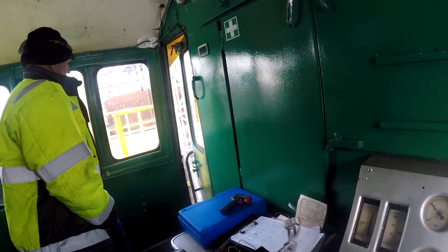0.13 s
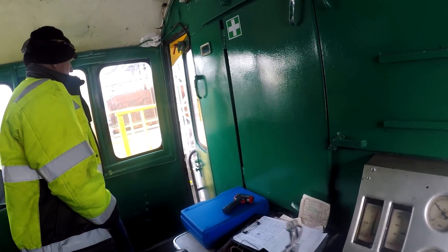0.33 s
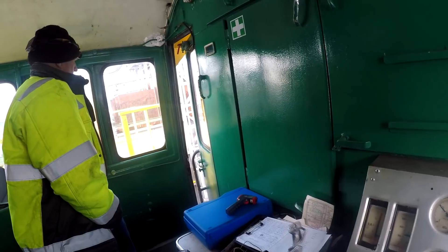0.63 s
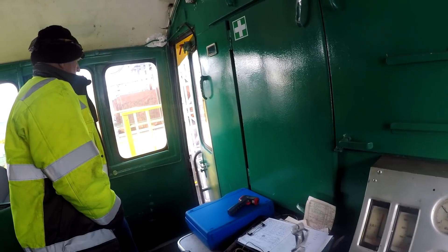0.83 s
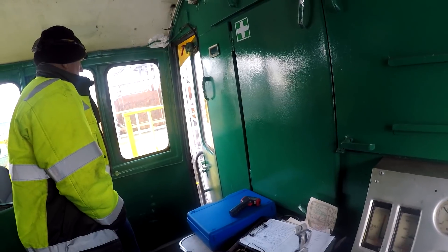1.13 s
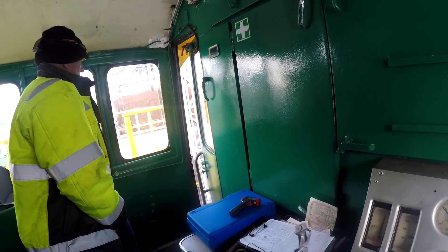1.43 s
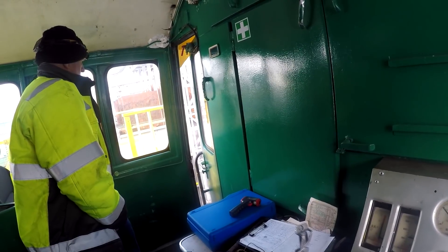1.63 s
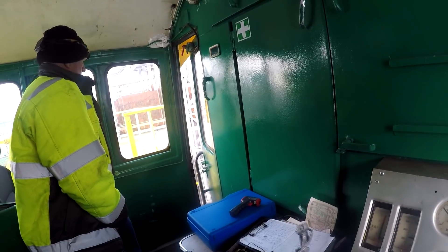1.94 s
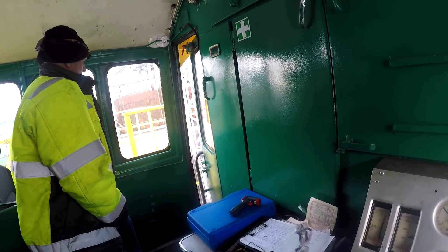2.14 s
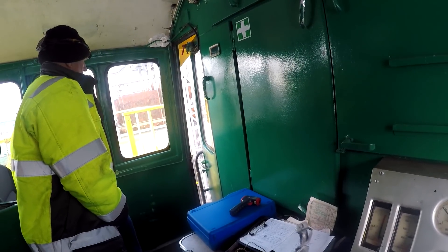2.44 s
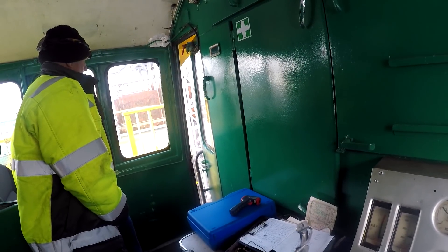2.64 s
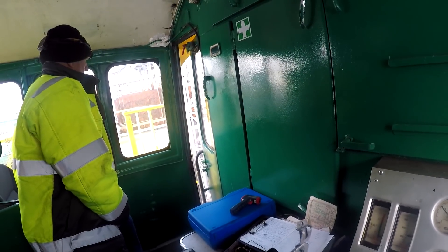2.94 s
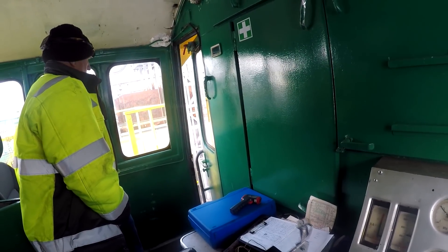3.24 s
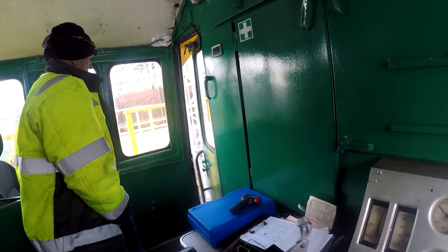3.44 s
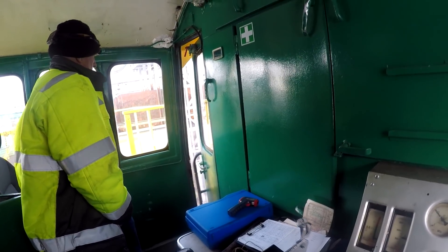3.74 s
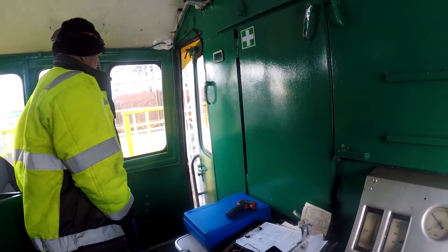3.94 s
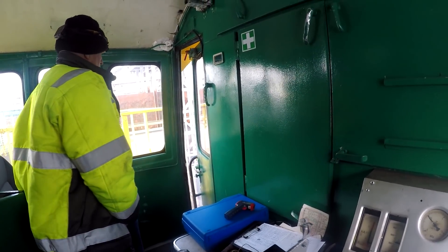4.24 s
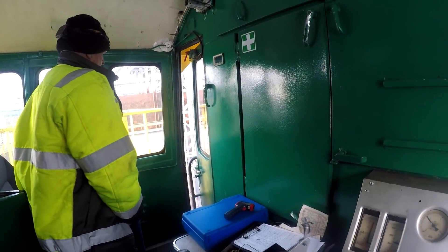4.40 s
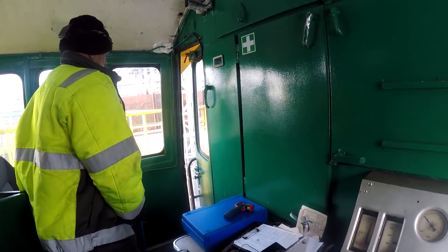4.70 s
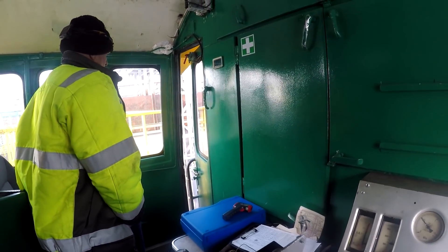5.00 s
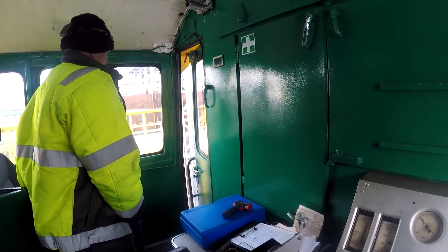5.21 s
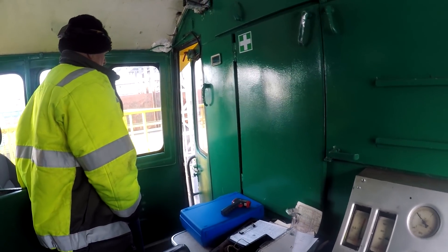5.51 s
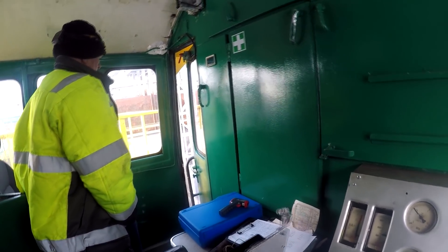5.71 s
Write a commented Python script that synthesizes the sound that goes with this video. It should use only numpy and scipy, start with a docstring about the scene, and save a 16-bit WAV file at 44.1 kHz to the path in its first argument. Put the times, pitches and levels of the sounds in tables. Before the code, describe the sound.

For about six seconds a large diesel locomotive engine idles at constant speed, heard in stereo inside its closed steel cab. A deep drone throbs with a lope about three times a second, while dull noisy firing pulses beat roughly 37 times a second. A compressor hums alongside, beating with the engine in a low boom two to three times a second. Steel parts ring briefly in a repeating round, and short hollow tones swell and fade in the drone. A loose panel sizzles brightly and unevenly throughout, easing slightly, with sharper snaps from about 0.9 s onward. Harder knocks clank irregularly, clearly around 1.8, 2.4 and 2.7 s. Dry sheet-metal rattles come and go, strongest near 5.3 s. Faint gear whine stays underneath. Small fittings clink at 4.2 and 5.3 s, then most clearly with a bright tick at 5.7 s and dull rings at 5.8 s.

```python
"""Diesel locomotive cab at idle

Inside a closed cab, a twelve-cylinder four-stroke idles at about 370 rpm: sums of shaft orders drone and throb,
and shaped noise pulses at the firing rate. Cylinder knocks ring steel parts in a repeating round, and short tones
swell and fade in the drone. An air compressor hums and beats with the engine in the cab's boom; a loose panel
sizzles as both shake it. Sheet metal rattles in bursts of noise, gears whine as faint sines and small fittings
clink as damped modes."""
import sys
import numpy as np
from scipy import signal
from scipy.fft import rfft, irfft
from scipy.io import wavfile
from scipy.ndimage import map_coordinates

SR = 44100
rng = np.random.default_rng(int(sys.argv[2]) if len(sys.argv) > 2 else 0)


def unload_wav(signal):
    """Save mono or channel-first audio to the path in sys.argv[1] as 16-bit WAV at rate SR, clipped to [-1, 1]."""
    wavfile.write(
        sys.argv[1],
        SR,
        np.round(np.clip(np.atleast_2d(signal).T, -1, 1) * 32767).astype(np.int16),
    )


N = 258426
T = np.arange(N) / SR
FREQS = np.fft.rfftfreq(N, 1 / SR)
# a 2 ms fade at both ends keeps the filters from clicking
EASE = np.clip(np.minimum(T, T[-1] - T) / .002, 0, 1)

CYCLE_HZ, COMPRESSOR_HZ = 3.1072, 26.68  # nominal rates of the engine cycle and the compressor shaft
FIRST_FIRING_S = .021  # a cylinder fires at this time

# steady engine drone: (multiple of the cycle rate, level [dB])
ENGINE_ORDERS = [(6, -23.1), (7, -41), (14, -38.4), (15, -32.9), (20, -33.5), (21, -38.5), (22, -33.5),
                 (24, -31), (25, -36), (26, -38), (30, -36), (36, -34), (42, -37.5), (90, -35), (100, -39),
                 (176, -42.5), (183, -42), (184, -39), (186, -43), (199, -40.5), (208, -43.5)]
# lope around the firing rate, order 12: (multiple of the cycle rate, level [dB])
LOPE_ORDERS = [(10, -33.9), (11, -29.3), (12, -23.3), (13, -28.8)]
LOPE_CREST_S = .216


def drone(cycles):
    """Harmonic orders: those around the firing rate swell together once a cycle, as the cylinders are unequal."""
    return hum(cycles, ENGINE_ORDERS, waver_db=.6) + throb(cycles, LOPE_ORDERS, LOPE_CREST_S)


# knock of each cylinder, in firing order: strength [dB]
CYLINDERS_DB = [0.062, -0.29, -0.088, 1.1, 0.57, 0.75, 1.05, -0.48, 0.04, -0.12, -0.35, 1.4]
# machinery noise behind the bulkhead, before the cab's response: (frequency [Hz], density [dB per Hz])
MACHINERY = [(12, -53), (30, -49.5), (70, -44), (100, -45), (140, -41.5), (230, -43), (430, -46.5),
             (700, -53.5), (1100, -64.5), (1700, -72.5), (2500, -75), (3500, -76), (4600, -81),
             (14000, -104)]
# part of that noise that comes back alike in every engine cycle: (frequency [Hz], power share [0-1])
REPEATING = [(70, 0.4), (150, 0.32), (330, 0.36), (550, 0.21), (1100, 0.24), (2500, 0.11)]
# resonances of the cab's air and steel walls: (frequency [Hz], width [Hz], gain [dB])
CAB_MODES = [(238, 20, 2), (427, 30, 1), (578, 18, 4.5), (616, 26, 6), (648, 10, 5), (778, 30, 2),
             (1060, 140, 2), (1385, 190, 6.3), (1795, 50, 3), (3400, 500, 1.5)]
# nodes of the cab's standing waves at the listener: (frequency [Hz], width [Hz], gain [dB])
CAB_NODES = [(178, 30, -2.5), (260, 14, -7), (302, 30, -2), (342, 10, -4), (378, 16, -4), (557, 10, -5),
             (633, 10, -8), (700, 70, -3), (830, 60, -1.5)]


def clatter(cycles, knock_db, knock_decay, smear_s):
    """Amplitude modulation: each firing gives a noisy blow, partly alike in every cycle; knock_decay is in firings."""
    length = int(SR / CYCLE_HZ)
    place = cycles % 1 * length
    one_cycle = rng.standard_normal((2, length))
    same = np.array([map_coordinates(row, [place], order=3, mode="wrap") for row in one_cycle])
    fresh = rng.standard_normal((2, N))
    share = np.clip(curve(REPEATING), 0, 1)
    noise = irfft(rfft(same) * np.sqrt(share) + rfft(fresh) * np.sqrt(1 - share), N)

    firing = cycles % 1 * len(CYLINDERS_DB)
    cylinder_db = np.array(CYLINDERS_DB)[firing.astype(int)]
    blow = undb(cylinder_db + knock_db * np.exp(-(firing % 1) / knock_decay))
    # each blow lingers between the steel walls
    blow = irfft(rfft(blow) / (1 + 2j * np.pi * FREQS * smear_s), N)
    cab_db = sum(db / (1 + (2 * (FREQS - hz) / width) ** 2) for hz, width, db in CAB_MODES + CAB_NODES)
    return colour(noise * unit_power(blow), curve(MACHINERY) + cab_db)


# steel parts that ring once in every engine cycle, before the common gain:
# (first crest [s], pitch [Hz], level [dB], length [s])
RINGS = [(.02, 203, -29, .06), (.055, 186, -29.5, .07), (.055, 158, -29, .06), (.08, 238, -29, .05),
         (.28, 244, -28, .07), (.085, 285, -26.5, .06), (.008, 315, -31, .06), (.13, 316, -31, .06),
         (.17, 429, -30.5, .06), (.255, 424, -31.5, .06), (.185, 573, -29, .09), (.06, 572, -33, .06),
         (.025, 620, -29, .04), (.15, 619, -29, .03), (.21, 617, -30, .08), (.018, 778, -32, .03),
         (.1, 785, -36, .02), (.19, 738, -35, .05), (.28, 835, -34, .02), (.11, 1070, -35, .02),
         (.172, 1060, -37, .025), (.025, 1335, -40, .016)]


def rings(cycles, gain_db, scatter_db, slack, rise):
    """Repeated excitation: every cycle sets the same parts ringing, with random strength and phase (slack in turns)."""
    out = np.zeros(N)
    for crest_s, hz, db, length_s in RINGS:
        turn = cycles + (FIRST_FIRING_S - crest_s) * CYCLE_HZ + .5
        age = (turn % 1 - .5) / CYCLE_HZ  # negative while the ring builds up
        # one pair of draws for each cycle
        strength, slip = rng.standard_normal((24, 2))[np.floor(turn).astype(int) + 1].T
        spread = np.where(age < 0, rise, 1 - rise) * length_s
        envelope = np.exp(-(age / spread) ** 2) * undb(db + scatter_db * strength)
        out += envelope * np.cos(2 * np.pi * (hz * age + slack * slip + rng.random()))
    return spread_tones(out) * np.sqrt(2) * undb(gain_db)


# short tonal swells in the cab's drone, before the common gain:
# (crest [s], pitch [Hz], level [dB], length [s])
TONAL_SWELLS = [(.33, 314, -20.5, .055), (.45, 318, -22.5, .11), (.76, 200, -22, .1), (.82, 573, -24, .08),
                (.98, 316, -22.5, .08), (1.05, 203, -22, .07), (1.13, 311, -23.5, .08),
                (1.36, 316, -23.5, .08), (1.73, 312, -21, .08), (1.79, 572, -26, .1),
                (1.93, 314, -20.5, .08), (2.05, 313, -22, .07), (2.11, 572, -24, .08),
                (2.68, 134, -21.5, .09), (2.7, 308, -21.5, .08), (2.92, 316, -22.5, .08),
                (3.22, 311, -21, .07), (3.4, 571, -24.5, .08), (3.65, 314, -20, .07),
                (3.88, 316, -22.5, .08), (3.93, 138, -22.5, .08), (4.28, 134, -21, .07),
                (4.37, 574, -26, .1), (4.52, 314, -22, .07), (4.68, 572, -26, .09), (4.77, 314, -22.5, .06),
                (4.84, 314, -20.5, .07), (5.0, 134, -23, .12), (5.05, 574, -24.5, .09),
                (5.16, 312, -21, .07), (5.26, 313, -19, .08), (5.29, 617, -26.5, .1),
                (5.48, 203, -21.5, .1), (5.59, 617, -27, .08), (5.8, 203, -20, .1)]


def tonal_swells(gain_db):
    """Gaussian envelope: short clear tones swell and fade in the drone."""
    out = np.zeros(N)
    for s, hz, db, length_s in TONAL_SWELLS:
        envelope = np.exp(-(2 * (T - s) / length_s) ** 2) * undb(db)
        out += envelope * np.cos(2 * np.pi * (hz * T + rng.random()))
    return spread_tones(out) * np.sqrt(2) * undb(gain_db)


# the hardest cylinder knocks: (time [s], relative strength [dB])
KNOCKS = [(.1, -3), (.166, -2), (.808, -1.5), (1.07, -4), (1.13, -.5), (1.45, -4), (1.773, .5), (2.093, -3),
          (2.416, 1), (2.728, .5), (3.0, -3), (3.06, -3), (3.321, -2.5), (3.644, -4.5), (3.964, -4),
          (4.34, -2.5), (4.611, -4.5), (4.933, -5), (5.566, -4), (5.626, -4.5)]
# their clank in the steel bulkhead, before the envelope: (frequency [Hz], density [dB per Hz])
KNOCK_SPECTRUM = [(500, -86), (820, -54.5), (1080, -57), (1200, -57.5), (1380, -61.5), (1600, -70.5),
                  (2500, -82), (6000, -110)]


def cylinder_knocks():
    """Impact excitation: hard knocks clank in the bulkhead as brief coloured noise."""
    return bursts(KNOCKS, KNOCK_SPECTRUM, attack_s=.0058, decay_s=.033, grain_db=.5)


# compressor hum: (multiple of the shaft rate, level [dB])
COMPRESSOR_ORDERS = [(1, -23.7), (3, -23.7), (5, -28.5), (6, -29.5), (7, -31), (9, -33.5), (12, -36),
                     (13, -41)]


def compressor_hum(strokes):
    """Harmonic series: the compressor's tones are whole multiples of its shaft rate."""
    return hum(strokes, COMPRESSOR_ORDERS, waver_db=1)


# engine orders in the cab's boom: (multiple of the cycle rate, level [dB])
BOOM_ORDERS = [(16, -30.5), (17, -30), (18, -23.8)]
BOOM_CREST_S, BOOM_BEAT_S = .172, .135  # the engine orders crest; the compressor falls in step


def boom(cycles, strokes, compressor_db):
    """Beating: the lowest air mode takes up both machines, and the strongest two orders beat 2.6 times a second."""
    crest, meet = int(BOOM_CREST_S * SR), int(BOOM_BEAT_S * SR)
    # compressor order 2 is in phase with engine order 18 at the meeting time
    compressor_turns = 2 * (strokes - strokes[meet]) + 18 * (cycles[meet] - cycles[crest])
    return throb(cycles, BOOM_ORDERS, BOOM_CREST_S) + tone(compressor_turns, compressor_db, waver_db=.4)


# sizzle of the loose panel, also the colour of its snaps: (frequency [Hz], density [dB per Hz])
PANEL = [(1500, -75.5), (3200, -79.5), (4600, -81), (5800, -76.5), (7500, -75), (8200, -84), (9900, -87.5),
         (11300, -99.5), (12500, -102), (14000, -106)]
# vibrations that shake the panel, rate = engine order x cycle rate + compressor order x shaft rate:
# (engine order, compressor order, depth before the shake factor [dB], time of one cosine peak [s])
BEATS = [(6, 0, 1.66, .0535), (-6, 1, 1, 0.064), (12, -1, 0.85, 0.054), (12, 0, -0.46, 0.053),
         (3, 0, 0.5, 0.086)]
# swells that make the sizzle chug unevenly: (rate [Hz], depth [dB], time of one crest [s])
SWELLS = [(.917, 0, 0.74), (1.936, 1, 0.027), (2.57, 0.47, 0.22), (3.107, .5, 0.2), (5.141, 0.3, 0.065),
          (7.359, .5, .018), (9.962, 0.57, 0.081)]
PANEL_FADE_DB_PER_S = .17  # the sizzle slowly eases


def panel(shake, snap, flutter_db, drift_db):
    """Chatter: beating vibration modulates a spray of contacts that breaks free fast and settles slowly."""
    drive_db = 0
    for engine, compressor, db, crest_s in BEATS:
        hz = engine * CYCLE_HZ + compressor * COMPRESSOR_HZ
        angle = 2 * np.pi * hz * (T - crest_s)
        # the second harmonic skews each beat
        drive_db = drive_db + shake * db * (np.cos(angle) - snap * np.sin(2 * angle))
    swell_db = sum(db * np.cos(2 * np.pi * hz * (T - crest_s)) for hz, db, crest_s in SWELLS)
    chance_db = flutter_db * walk(40) + drift_db * walk(9.3)
    contacts = undb(drive_db + swell_db - PANEL_FADE_DB_PER_S * T + chance_db)
    return colour(rng.standard_normal((2, N)) * unit_power(contacts), curve(PANEL))


# the loose panel snaps free extra hard: (time [s], relative strength [dB])
SNAPS = [(.9, 0), (.96, 1.5), (1.168, 2), (1.703, 0), (2.13, 2), (2.515, 2), (2.678, 1), (2.995, .5),
         (3.79, -1), (4.06, 1.5), (4.275, 2.5), (4.757, 1.5), (4.915, 1), (5.13, .5), (5.405, -1)]


def panel_snaps():
    """Sudden release: each hard snap is a short burst of noise with the panel's own colour."""
    return bursts(SNAPS, PANEL, attack_s=.003, decay_s=.018, grain_db=0)


# short dry rattles of loose sheet metal: (time [s], relative strength [dB])
RATTLES = [(.04, -3), (.305, -2), (.574, -2), (1.543, -1.5), (1.66, -3), (3.06, -.5), (3.154, -2),
           (4.02, -1), (4.657, -1), (5.298, 3)]
# their colour, before the envelope: (frequency [Hz], density [dB per Hz])
RATTLE_SPECTRUM = [(900, -93), (1800, -70), (3400, -70.5), (4500, -81), (7500, -83), (13000, -104)]


def sheet_rattles():
    """Repeated contact: loose sheet metal gives short bursts of grainy noise."""
    return bursts(RATTLES, RATTLE_SPECTRUM, attack_s=.0098, decay_s=.025, grain_db=4.5)


# hum and whine of generator, blower and gears: (frequency [Hz], level [dB])
WHINE = [(194.5, -37.2), (205.7, -31.7), (730.1, -47.9), (890.4, -49.2), (959.9, -50), (1787, -62),
         (2117.3, -61.5), (2197.1, -56)]


def machine_whine():
    """Line spectrum: faint tones share one slightly hunting speed."""
    return hum(shaft(1, wander=.0004), WHINE, waver_db=2.2)


# small knocks of loose fittings:
# (time [s], ring pitch [Hz], ring gain [dB], tick gain [dB], left minus right [dB])
CLINKS = [(4.204, 1335, -15.5, -55, 0), (5.311, 1400, -27, -38, 1.5), (5.7308, 1440, -12.5, -7.5, 3.5),
          (5.807, 1345, -18.5, -55, .5), (5.831, 1340, -23.5, -55, .5)]
# modes of the ring: (multiple of the ring pitch, level before the ring gain [dB], t60 [s])
CLINK_BODY = [(.94, -14, .022), (1, 0, .037), (1.07, -11, .022)]
# modes of the tick: (frequency [Hz], level before the tick gain [dB], t60 [s])
CLINK_TICK = [(4770, -6, .01), (5100, -6, .011), (5450, -9, .01), (5950, -7, .01), (6500, -14, .01),
              (7200, -15, .01)]


def clinks():
    """Modal decay: light knocks excite a dull ring and a short bright tick."""
    out = np.zeros((2, N))
    for s, ring_hz, ring_db, tick_db, pan_db in CLINKS:
        start = int(s * SR)
        age = T[:min(SR // 10, N - start)]
        body = ring([(ratio * ring_hz, db, t60) for ratio, db, t60 in CLINK_BODY], age)
        tick = ring(CLINK_TICK, age)
        build_up, contact = 1 - np.exp(-age / .003), 1 - np.exp(-age / .0005)
        hit = undb(ring_db) * build_up * body + undb(tick_db) * contact * tick
        out[:, start:start + len(age)] += undb([[pan_db / 2], [-pan_db / 2]]) * hit
    return out


def bursts(rows, spectrum, attack_s, decay_s, grain_db):
    """Transient excitation: each blow sets off a quick, exponentially dying spray of contacts."""
    envelope = np.zeros(N)
    for s, db in rows:
        age = np.maximum(T - s, 0)
        envelope += undb(db) * (1 - np.exp(-age / attack_s)) * np.exp(-age / decay_s)
    grain = unit_power(undb(grain_db * walk(250)))
    spray = rng.standard_normal((2, N)) * grain * envelope / envelope.max()
    return colour(spray, curve(spectrum))


def ring(modes, age):
    """Free vibration: damped sines after a blow."""
    return sum(undb(db - 60 * age / t60) * np.sin(2 * np.pi * hz * age) for hz, db, t60 in modes)


def tone(turns, db, waver_db):
    """Simple harmonic motion: a sine, its crests on whole turns, wavers a little in level."""
    swell = np.interp(T, np.linspace(0, T[-1], 30), rng.standard_normal(30))
    return np.sqrt(2) * undb(db + waver_db * swell) * np.cos(2 * np.pi * turns)


def hum(turns, lines, waver_db):
    """Phase locking: all lines follow one rotation."""
    return sum(tone(k * turns + rng.random(), db, waver_db) for k, db in lines)


def throb(cycles, orders, crest_s):
    """Superposition: neighbouring orders fall in step once in every cycle."""
    turns = cycles - cycles[int(crest_s * SR)]
    return sum(tone(k * turns, db, waver_db=.4) for k, db in orders)


def shaft(hz, wander):
    """Frequency modulation: turns made by a governed shaft whose speed hunts slightly."""
    return np.cumsum(hz * (1 + wander * walk(.54))) / SR


def walk(rate):
    """Low-pass noise: slow chance with a spread of 1, its bandwidth set by rate in Hz."""
    y = irfft(rfft(rng.standard_normal(N)) * np.exp(-(FREQS / rate) ** 2), N)
    return y / y.std()


def undb(db):
    """Logarithmic level: decibels to amplitude gain."""
    return 10 ** (np.asarray(db) / 20)


def unit_power(envelope):
    """Normalization: an envelope with a mean square of 1."""
    return envelope / np.sqrt(np.mean(envelope ** 2))


def curve(points):
    """Interpolation: a table of (frequency [Hz], value) joined on a log-frequency axis."""
    hz, value = np.transpose(points)
    return np.interp(np.log(FREQS + 1), np.log(hz), value)


# likeness of the two ears: (frequency [Hz], coherence [0-1], phase lead of the left [rad])
LIKENESS = [(60, 0.94, 0.37), (140, 1, 0.024), (296, 0.94, 0.047), (610, 0.99, 0.76), (895, 0.61, 1.67),
            (1340, 0.98, 1.57), (1800, 0, 2.14), (2460, 0.57, 0.008), (4050, 1, 0.44), (5200, 0.6, 0.95),
            (7200, 0.14, 1.8), (13000, 0, 2.3)]


def colour(noises, db):
    """Interaural coherence: two white noises become stereo whose middle has the given dB per Hz."""
    table = np.array(LIKENESS)
    alike, lead = np.clip(curve(table[:, [0, 1]]), 0, 1), curve(table[:, [0, 2]])
    shared, apart = rfft(noises) * np.sqrt([1 + alike, 1 - alike])
    left = (shared + apart) * np.exp(.5j * lead)
    right = (shared - apart) * np.exp(-.5j * lead)
    # offsets the change in the middle's level made by the phase lead
    middle_gain = np.sqrt(SR / 2 / (1 + alike * np.cos(lead)))
    return irfft(np.array([left, right]) * undb(db) * middle_gain, N)


def spread_tones(x):
    """Interaural phase: a tone in the cab reaches the left ear a little ahead."""
    lead = curve(np.array(LIKENESS)[:, [0, 2]])
    return irfft(rfft(x * EASE) * np.exp(.5j * np.array([lead, -lead])), N)


# stereo balance of all but the clinks: (frequency [Hz], left minus right [dB])
BALANCE_DB = [(60, -1.5), (110, -2.0), (200, -3.0), (370, -3.0), (670, -3.0), (1220, 0.0), (2230, 1.0),
              (4070, -0.5), (7440, -1.0), (13600, -5.0)]


def scene():
    """Superposition: engine, compressor and rattles add up, a little louder on the right over most pitches."""
    cycles = shaft(CYCLE_HZ, wander=.00028) - FIRST_FIRING_S * CYCLE_HZ
    strokes = shaft(COMPRESSOR_HZ, wander=.00038)
    cab = drone(cycles) + clatter(cycles, knock_db=3, knock_decay=.25, smear_s=.002)
    cab = cab + rings(cycles, gain_db=-.1, scatter_db=1.5, slack=.11, rise=.43)
    cab = cab + tonal_swells(gain_db=.44) + cylinder_knocks()
    cab = cab + compressor_hum(strokes) + boom(cycles, strokes, compressor_db=-22.5)
    cab = cab + panel(shake=1.16, snap=.4, flutter_db=.75, drift_db=.5) + panel_snaps()
    cab = cab + sheet_rattles() + machine_whine()
    balance = curve(BALANCE_DB)
    return irfft(rfft(cab * EASE) * undb(np.array([balance, -balance]) / 2), N) + clinks()


TOP_HZ = 14200  # edge of the treble cut


def record(dry):
    """Band limiting and saturation: drops the deepest rumble, rounds the highest peaks and cuts the top."""
    bass_cut = signal.sosfilt(signal.butter(2, 11, "high", fs=SR, output="sos"), dry)
    rounded = bass_cut / (1 + bass_cut ** 8) ** (1 / 8)
    return signal.sosfilt(signal.ellip(8, .2, 70, TOP_HZ, fs=SR, output="sos"), rounded)


dry = scene()
out = record(dry)
unload_wav(out)
```